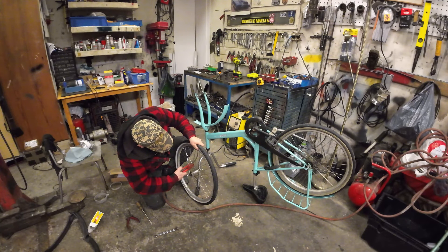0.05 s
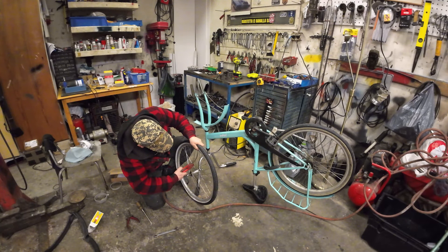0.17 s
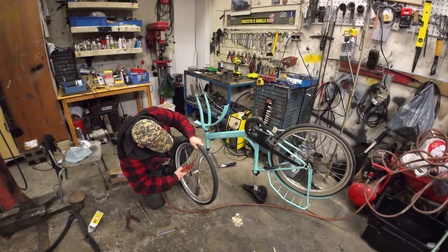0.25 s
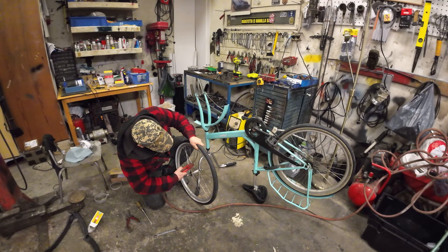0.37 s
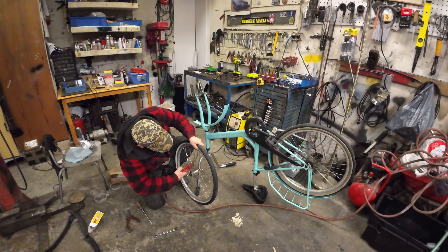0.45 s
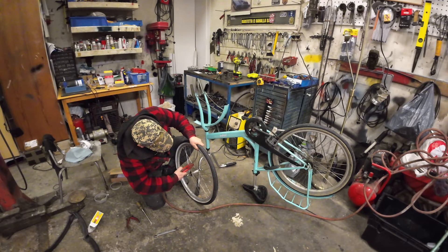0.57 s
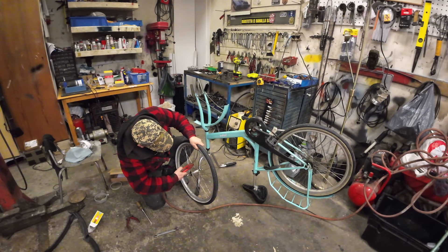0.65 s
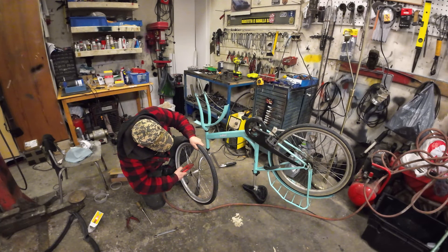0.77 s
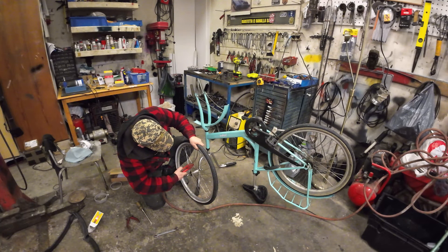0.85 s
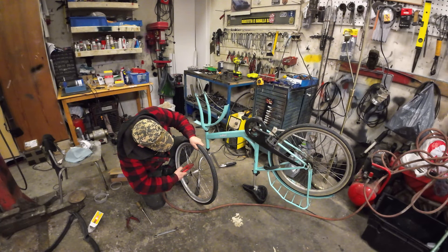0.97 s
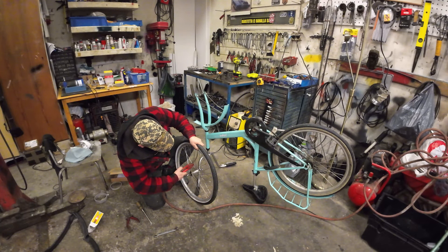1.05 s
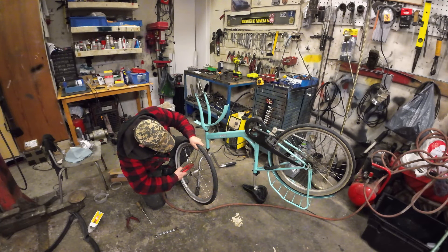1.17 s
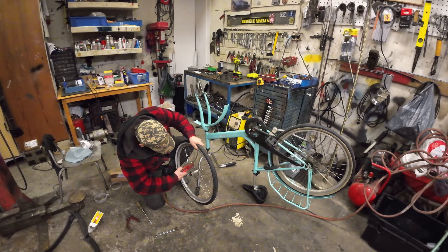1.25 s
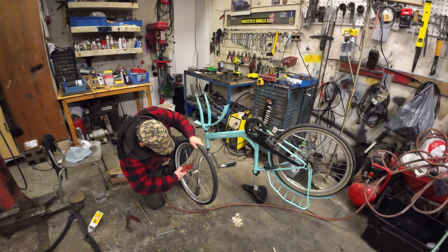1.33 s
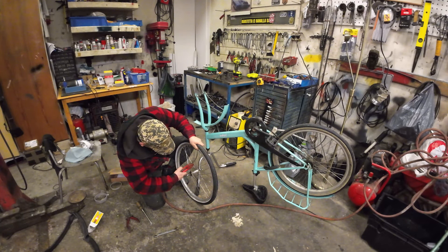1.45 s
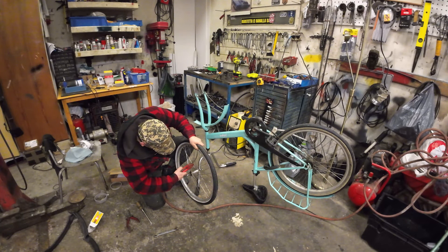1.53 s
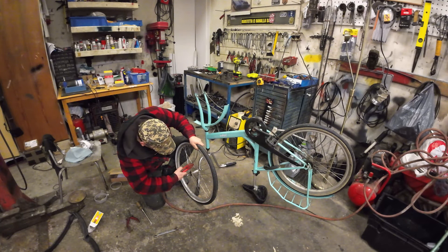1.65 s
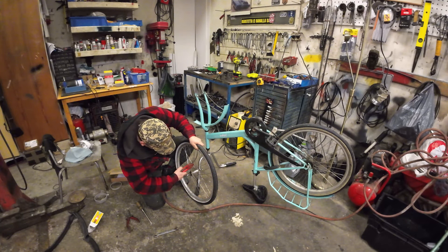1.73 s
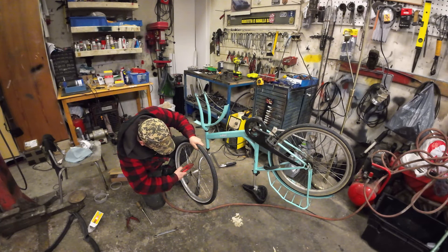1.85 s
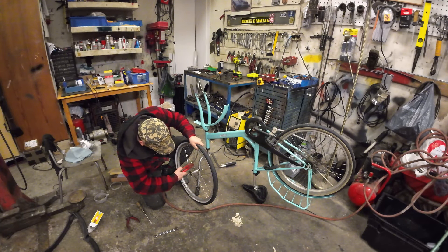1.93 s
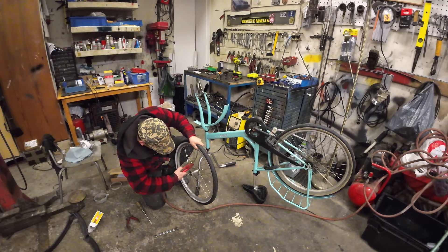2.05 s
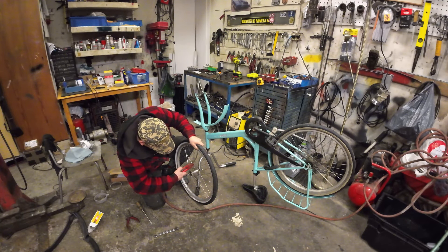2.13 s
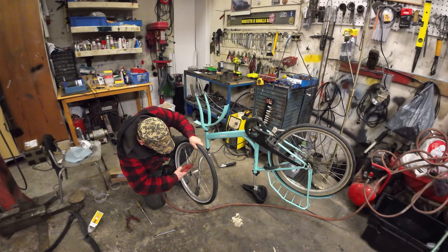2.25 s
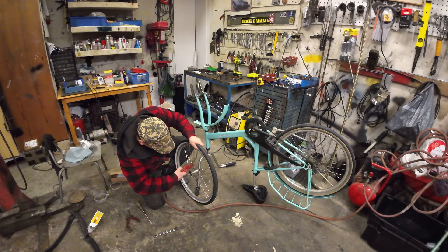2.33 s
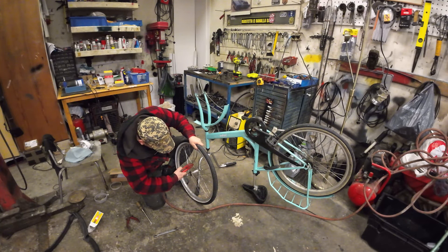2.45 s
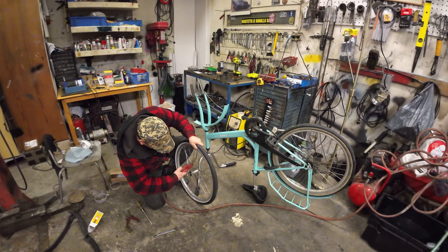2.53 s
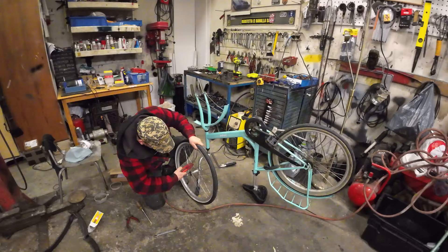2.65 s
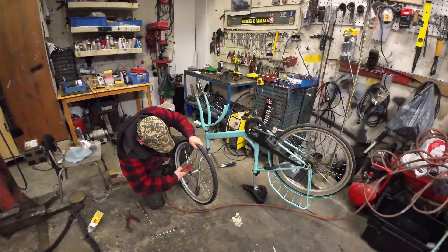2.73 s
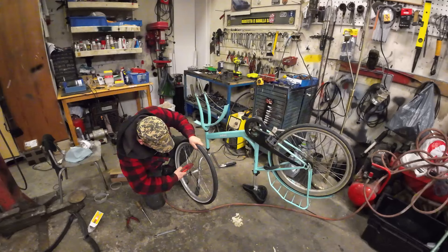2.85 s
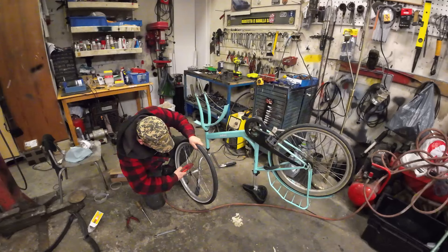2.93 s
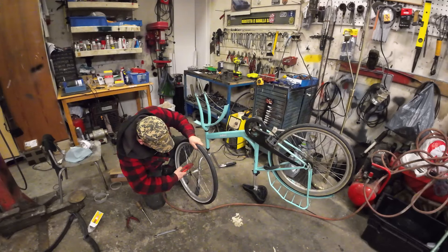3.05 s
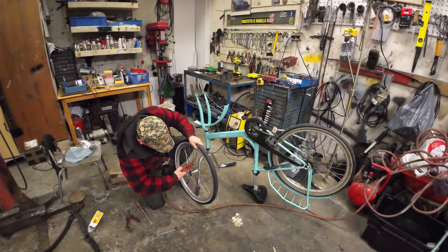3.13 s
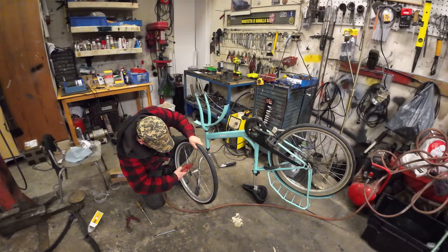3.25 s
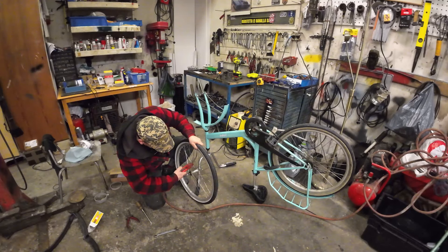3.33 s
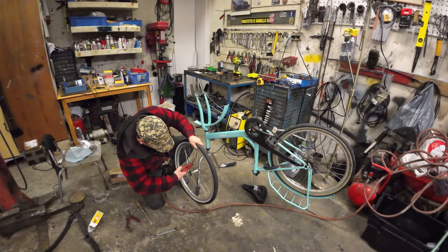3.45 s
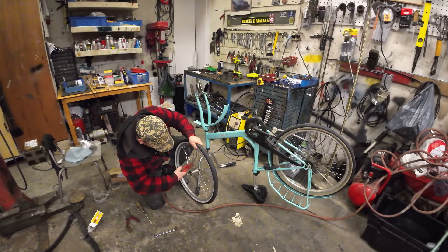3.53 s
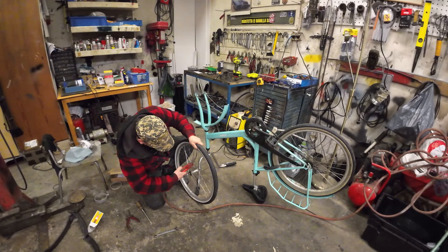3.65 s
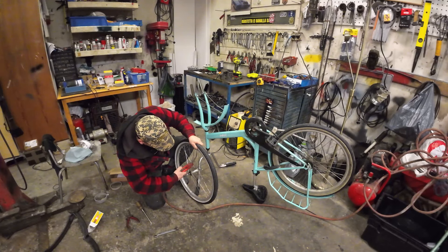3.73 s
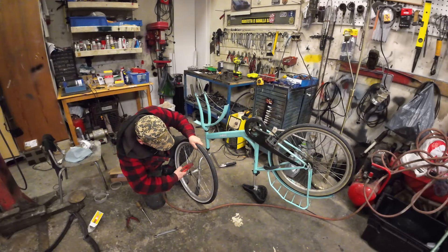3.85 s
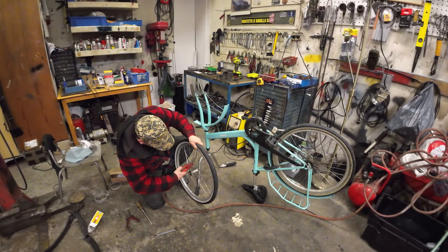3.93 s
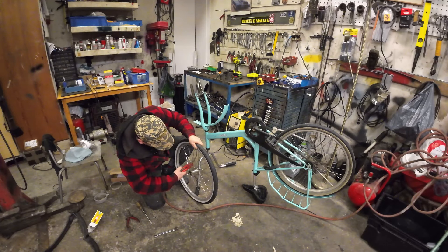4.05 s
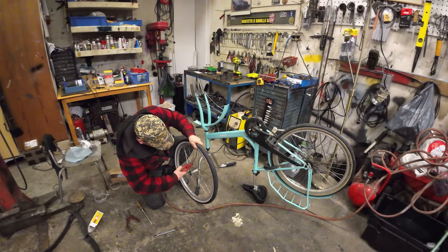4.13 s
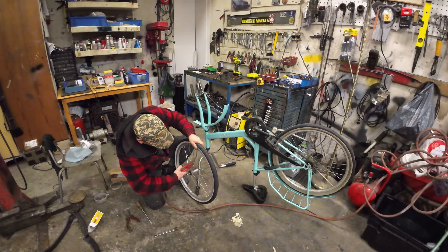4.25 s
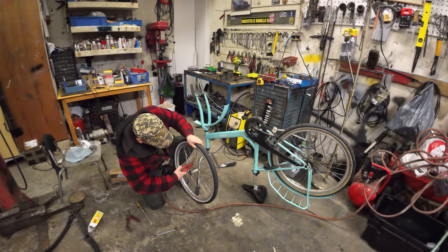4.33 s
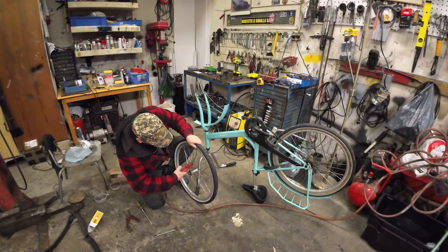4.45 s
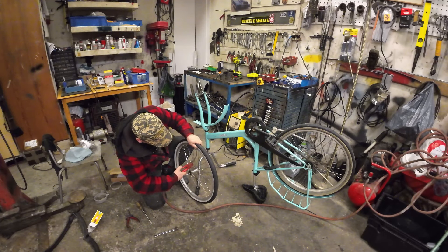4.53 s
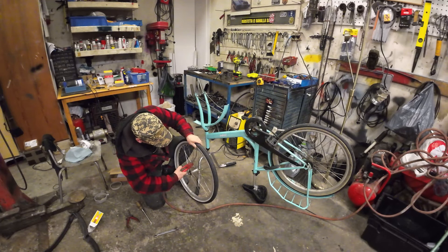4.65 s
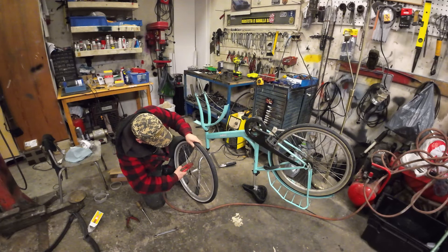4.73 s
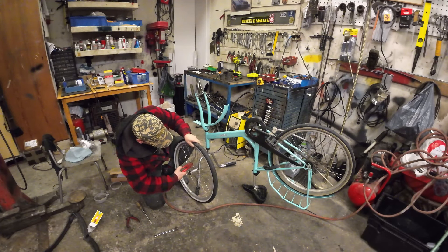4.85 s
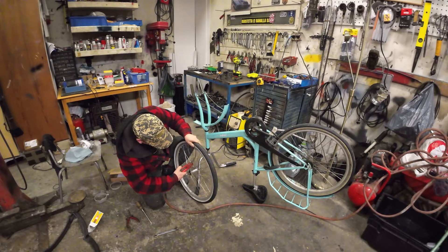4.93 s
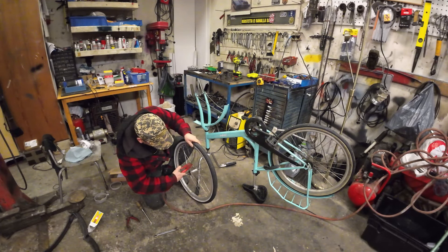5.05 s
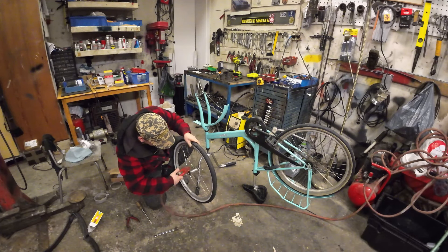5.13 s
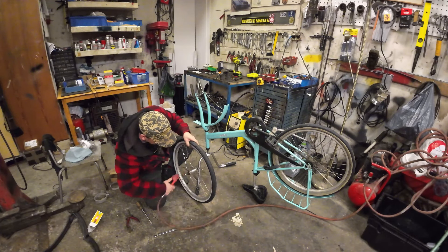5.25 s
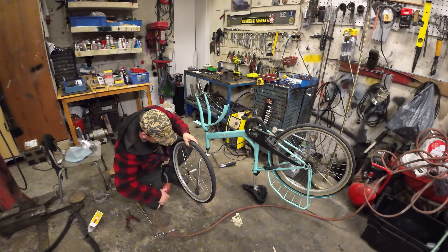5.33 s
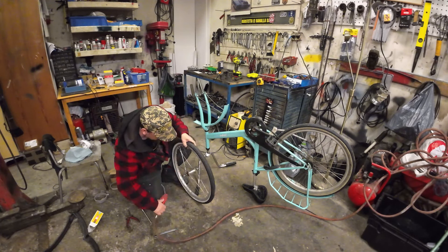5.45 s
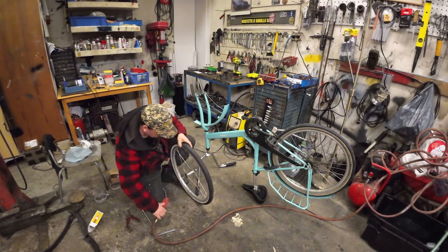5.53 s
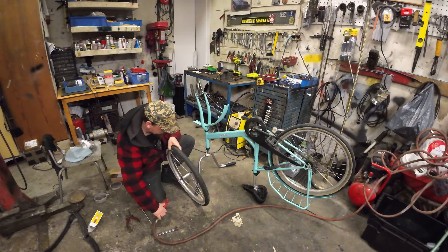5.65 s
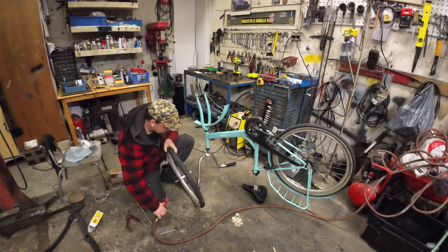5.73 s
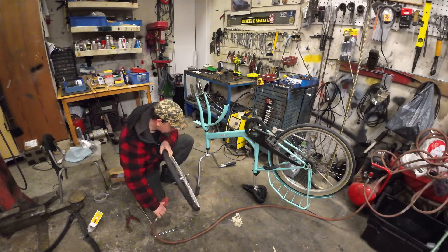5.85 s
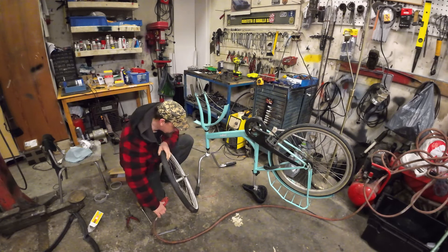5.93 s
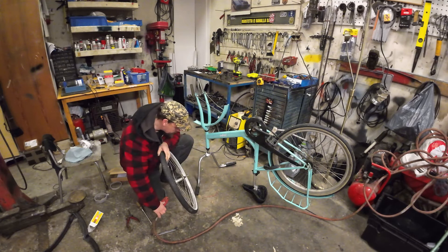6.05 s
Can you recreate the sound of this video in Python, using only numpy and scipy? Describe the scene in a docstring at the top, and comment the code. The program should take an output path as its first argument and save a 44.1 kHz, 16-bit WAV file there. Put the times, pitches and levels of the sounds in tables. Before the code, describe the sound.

Pressurised air hisses long, then twice shorter, with sputtering leaks; a hose fitting knocks the garage floor and clothing rustles.

```python
"""Three hissing bursts of air leaking past a chuck as a bicycle tyre is filled in a cluttered garage.
The leak sputters as the first burst starts and around the end of the last. Then the chuck is pulled away
and clinks on the concrete; sleeves, shoes and hose rustle. A mains hum and a low rumble fill the room.
Air and rubbing are shaped noise, sputter is random pops, clinks are noise cracks plus decaying modes.
"""
import sys
import numpy as np
from scipy import signal
from scipy.fft import rfft, irfft, next_fast_len
from scipy.io import wavfile

SR = 44100
rng = np.random.default_rng(int(sys.argv[2]) if len(sys.argv) > 2 else 0)


def log_audio(samples):
    """Write samples as a 16-bit WAV file to the path given in sys.argv[1]."""
    # one column per channel
    frames = np.atleast_2d(samples).T
    # limit to full scale, then quantise
    limited = np.clip(frames, -1, 1)
    pcm = np.round(limited * 32767).astype(np.int16)
    wavfile.write(sys.argv[1], SR, pcm)


N = 268568
TIME = np.arange(N) / SR
SIZE = next_fast_len(N + SR)
HZ = np.maximum(np.arange(SIZE // 2 + 1) * SR / SIZE, 1)

# Chuck pressed on the valve. Each row: opening in seconds, shutting in seconds, snap time in seconds,
# lifting time in seconds, hiss in dB, bore in dB, share of the cavity lift, seating resonance in Hz.
BURSTS = [(0.145, 2.29, .003, 0.042, -36, -40.5, 0.42, 1550),
          (2.375, 3.501, 0.0018, 0.044, -37, -42, 1.15, 2010),
          (3.606, 4.212, 0.0074, .025, -38, -42.5, 0.54, 1820)]
# Spectra of the jet's hiss, its bore and the plume. Each row: frequency in Hz, relative density in dB per Hz.
HISS = [(1500, -14.5), (3000, -8.5), (3700, -3.5), (4600, -6.5), (6500, -3.5), (9000, -3.5), (12500, -1),
        (14000, -2.5), (16000, -7.5)]
BORE = [(450, -17), (680, -6), (790, 0), (1500, 0), (2200, -1), (3000, -2), (4200, -11), (7000, -35)]
RUSH = [(15, -2.5), (35, 2), (60, 2.5), (95, -0.5), (140, -3), (250, -4.5), (450, -1.5), (650, -5),
        (1000, -13.5), (2500, -33)]
# Resonances of gap and valve stem. Each row: frequency in Hz, width in Hz, lift in dB.
STEM = [(5044, 230, 5.5), (5410, 480, 3.5), (6070, 630, 2.5), (7800, 790, 4.5), (9370, 380, 4.5),
        (9890, 520, 5.5), (10620, 430, 7.5), (11360, 300, 4.5), (11900, 280, 6), (14780, 440, 5.5),
        (15260, 600, 7)]
# Cavity between chuck and valve. Each row: frequency in Hz, width in Hz, lift in dB at a share of 1.
CAVITY = [(815, 150, 1.5), (2630, 410, 6)]
# Whistle of the gap's edge. Each row: frequency in Hz, width in Hz, lift in dB.
WHISTLE = [(8260, 430, 6), (9340, 170, 7.5)]
# Spurts past the badly seated chuck. Each row: centre in seconds, half length in seconds, level in dB.
SPURTS = [(0.267, 0.036, -35), (0.36, 0.036, -43), (4.132, .012, -45.5), (4.277, 0.033, -48.5),
          (4.388, 0.022, -55)]
# Air seeping from the closed chuck. Each row: time in seconds, level in dB.
SEEP = [(0, -65.5), (4.65, -73.5), (4.95, -82), (5.6, -73.5), (5.85, -72), (6.09, -74.5)]
# Resonances of the seep. Each row: frequency in Hz, width in Hz, lift in dB.
SEEP_PEAKS = [(2510, 210, 16.5), (3450, 290, 12), (5700, 1000, 13.2), (10000, 700, 6.2)]
# Knocks of chuck and hose. Each row: start in seconds, level in dB, contact decay in seconds,
# share of metal ringing 0-1.
CLINKS = [(4.378, -47.5, .003, 0.15), (4.642, -48, 0.0016, 0), (5.111, -46.5, .004, 0.06),
          (5.1867, -35.5, 0.0064, 0.45), (5.1951, -36.5, 0.01, 0.33), (5.2127, -48, 0.0054, 0.4),
          (5.264, -50, .004, .3), (5.470, -50, .004, 0.1)]
# Modes of the metal chuck. Each row: frequency in Hz, relative level in dB, t60 in seconds.
CHUCK = [(1800, -1, 0.16), (2270, -4, .15), (2500, -7, 0.33), (2660, 2, 0.16), (3680, -3, 0.13),
         (5250, -3.5, 0.27), (5900, -10, 0.25), (6300, -2.5, 0.16), (7900, -1.5, .14), (11700, -9, 0.17)]
# Contact noise. Each row: frequency in Hz, relative density in dB per Hz.
CRACK = [(500, -5), (1400, -14), (1800, 2.5), (2700, -2), (4300, -7), (6400, 0), (7200, -6), (12000, -8),
         (13000, -15), (15500, -15)]
# Strokes of sleeves, shoes and hose; the first row is the fading tail of an earlier burst of air as the scene
# opens. Each row: start in seconds, level in dB, rise in seconds, decay in seconds, low-pass corner in Hz.
STROKES = [(0, -46, 0.0024, 0.026, 9100), (4.591, -53, 0.0056, 0.023, 2200), (4.64, -50, .002, .035, 2000),
           (4.71, -56, 0.0057, .05, 1800), (4.79, -57, 0.022, 0.049, 7000), (5.19, -50, 0.068, 0.073, 2500),
           (5.405, -49.5, .003, 0.025, 1400), (5.468, -49, 0.0098, 0.12, 7500),
           (5.74, -64, 0.13, 0.14, 6000)]
# Rubbing noise. Each row: frequency in Hz, relative density in dB per Hz.
CLOTH = [(60, -13), (200, -8), (450, -6), (900, -7.5), (2400, -11), (4500, -12.5), (6000, -13.5),
         (11500, -9), (16000, -25)]
# Decay of the garage. Each row: frequency in Hz, t60 in seconds.
GARAGE_T60 = [(100, 0.34), (600, 0.59), (2500, 0.54), (7000, 0.47), (15000, 0.2)]
# Reverberation against direct sound. Each row: frequency in Hz, level in dB.
GARAGE_DB = [(100, 0), (1500, -2), (5000, 0), (10000, -3), (15000, 1)]
# Diffuse sound at the two ports. Each row: frequency in Hz, left-right correlation.
LIKENESS = [(40, 0.079), (250, 0.35), (700, 0.68), (1300, 0.75), (2300, 0.99), (3500, 0.67), (6000, 0.35),
            (11000, -.15), (15000, .15)]
# Direct sound at the two ports. Each row: frequency in Hz, phase lead of the left in radians.
PORT_PHASE = [(100, 0.037), (4000, -0.34), (6000, -0.74), (8000, -0.48), (10500, -0.98), (13000, -0.23),
              (14700, -0.41), (15400, -.1)]
# Room rumble. Each row: frequency in Hz, relative density in dB per Hz.
AMBIENCE = [(18, 3), (45, -2.5), (100, -14.5), (150, -18), (230, -22.5), (380, -19.5), (620, -28),
            (1200, -26), (2400, -30.5), (4500, -35.5), (6000, -34), (11000, -41), (16000, -46)]
# Mains hum. Each row: frequency in Hz, rms level in dB before the trim of hum().
HUM = [(101, -69), (300.5, -70), (400, -71), (500.5, -77.5), (1200, -78.5)]

# the valve pin snaps open to a share of its travel, then is pressed home;
# bore and plume need a wider opening than the hiss
SNAP_SHARE, PRESS_S, BORE_POWER, RUSH_POWER = 0.21, 0.036, 1.46, 1.9
# the hose recharges between bursts, so each starts stronger and sags
SAG_DB, SAG_S = 2.5, 0.77
# the plume weakens steadily as the tyre fills
RUSH_DB, RUSH_FALL_DB_PER_S = -43.5, 2.5
# extra leak until the chuck is first seated
SURGE_AT_S, SURGE_HALF_S, SURGE_HISS_DB, SURGE_BORE_DB = 0.32, 0.063, 2.5, 4
# cavity resonance that moves with each seating
SEATING_WIDTH_HZ, SEATING_DB = 310, 3
WHISTLE_AT_S, WHISTLE_HALF_S = 2.68, 0.2
AMBIENCE_DB = -57.5
CUTOFF_HZ = 15790


def from_db(db):
    """Decibels to gain."""
    return 10 ** (np.asarray(db) / 20)


def rms_one(x):
    """Scale to unit rms."""
    return x / np.sqrt(np.mean(x ** 2) + 1e-20)


def at_hz(points, hz=HZ):
    """Read a table on a log-frequency axis."""
    centres_hz, values = np.transpose(points)
    return np.interp(np.log(hz), np.log(centres_hz), values)


def filtered(x, response):
    """Pass a signal through a frequency response."""
    return irfft(rfft(x, SIZE) * response, SIZE)[..., :N]


def bumps(peaks):
    """Gain in dB of a set of resonances."""
    return sum(lift_db / (1 + (2 * (HZ - hz) / width_hz) ** 2) for hz, width_hz, lift_db in peaks)


def swell(centre_s, half_s):
    """A smooth rise and fall of height 1."""
    return np.exp(-.5 * ((TIME - centre_s) / half_s) ** 2)


def drift(rate_hz):
    """Slow random wander, rms 1."""
    return rms_one(filtered(rng.standard_normal(N), 1 / (1 + (HZ / rate_hz) ** 2)))


def turbulence(gain_db):
    """Noise of the given colour, rms 1."""
    return rms_one(filtered(rng.standard_normal(N), from_db(gain_db)))


def sputter(per_s, spread_db, dull_hz):
    """Rounded pressure drops at random moments, rms 1."""
    sizes = from_db(spread_db * np.clip(rng.standard_normal(N), -2, 1.5))
    pops = (rng.random(N) < per_s / SR) * sizes
    pole = np.exp(-2 * np.pi * dull_hz / SR)
    return -rms_one(signal.lfilter([1], [1, -2 * pole, pole ** 2], pops - pops.mean()))


def air():
    """The jet hisses through the stem's resonances, blows in the bore and spreads into a lumpy, spitting plume."""
    eddies, surge = drift(rate_hz=53), swell(SURGE_AT_S, SURGE_HALF_S)
    hiss = whistle(turbulence(at_hz(HISS) + bumps(STEM)))
    hiss = hiss * from_db(SURGE_HISS_DB * surge - 0.75 + 0.38 * eddies)
    bore = turbulence(at_hz(BORE)) * from_db(SURGE_BORE_DB * surge - 4.5 + 0.54 * eddies)
    rush = turbulence(at_hz(RUSH)) * from_db(-3.0 + 2.5 * drift(rate_hz=26))
    spits = sputter(per_s=200, spread_db=4.5, dull_hz=3000) * from_db(-7.5)
    plume = (rush + spits) * from_db(RUSH_DB - RUSH_FALL_DB_PER_S * TIME)
    out = 0
    for start_s, end_s, snap_s, lift_s, hiss_db, bore_db, ringing, seating_hz in BURSTS:
        opening = valve(start_s, end_s, snap_s, lift_s)
        pressure = from_db(SAG_DB * np.exp(-np.maximum(TIME - start_s, 0) / SAG_S))
        jet = hiss * from_db(hiss_db) * opening + bore * from_db(bore_db) * opening ** BORE_POWER
        out = out + cavity(pressure * jet, ringing, seating_hz) + plume * opening ** RUSH_POWER
    return out


def valve(start_s, end_s, snap_s, lift_s):
    """Opening 0-1: it snaps ajar, widens as the chuck is pressed home and narrows as it lifts."""
    since_s, left_s = np.maximum(TIME - start_s, 0), np.maximum(end_s - TIME, 0)
    snapped = np.minimum(since_s / snap_s, 1)
    pressed = 1 - (1 - SNAP_SHARE) * np.exp(-since_s / PRESS_S)
    lifted = 1 - np.exp(-left_s / lift_s)
    return snapped * pressed * lifted


def whistle(hiss):
    """Two narrow resonances rise out of the hiss and sink back."""
    return hiss + swell(WHISTLE_AT_S, WHISTLE_HALF_S) * filtered(hiss, from_db(bumps(WHISTLE)) - 1)


def cavity(jet, ringing, seating_hz):
    """The cavity colours the jet, a little differently with each seating of the chuck."""
    peaks = [*CAVITY, (seating_hz, SEATING_WIDTH_HZ, SEATING_DB)]
    return filtered(jet, from_db(ringing * bumps(peaks)))


def spurts(pops_db, thump_db):
    """Air bursts out under the rim of the chuck: a low flutter full of pops."""
    strength = sum(from_db(db) * swell(centre_s, half_s) for centre_s, half_s, db in SPURTS)
    pops = sputter(per_s=280, spread_db=3.5, dull_hz=2200)
    # Hz, dB per Hz
    flutter = turbulence(at_hz([(15, -2), (50, -0.5), (130, -8.5), (600, -11), (2000, -34)]))
    return strength * (from_db(pops_db) * pops + from_db(thump_db) * flutter)


def seep():
    """A thin resonant hiss of air from the closed chuck, its hose still under pressure."""
    level_db = np.interp(TIME, *np.transpose(SEEP))
    # Hz, dB per Hz
    colour_db = at_hz([(500, -3), (2000, 0.0), (9000, -4.5), (16000, -2)])
    return turbulence(bumps(SEEP_PEAKS) + colour_db) * from_db(level_db)


def chuck(crack_db, ring_db, split):
    """Each knock is a short gritty crack plus ringing metal; the chuck's loose parts split every mode in six."""
    out, t = np.zeros(N + SR), TIME[:SR // 2]
    hz, level_db, t60_s = np.repeat(CHUCK, 6, axis=0).T[:, :, None]
    hz = hz * (1 + split * rng.uniform(-1, 1, hz.shape))
    decay = from_db(level_db - level_db.max() - 60 * t / t60_s)
    modes = decay * np.sin(2 * np.pi * hz * t)
    grit = turbulence(at_hz(CRACK))
    for start_s, db, contact_s, metal in CLINKS:
        at = int(start_s * SR)
        crack = grit[at:at + len(t)] * np.exp(-t / contact_s)
        ring = rng.uniform(-0.94, 1, len(modes)) @ modes
        out[at:at + len(t)] += from_db(db) * (from_db(crack_db) * crack + from_db(ring_db) * metal * ring)
    return out[:N]


def rustle(level_db, crease_db):
    """Noise of rubbing cloth and hose with small dull creases; each stroke rises and dies away. The first
    stands for the fading tail of an earlier burst of air."""
    rub = turbulence(at_hz(CLOTH))
    creases = from_db(crease_db) * sputter(per_s=70, spread_db=6.0, dull_hz=1900)
    out = 0
    for start_s, db, rise_s, decay_s, dull_hz in STROKES:
        rise = np.clip((TIME - start_s) / rise_s, 0, 1)
        fall = np.exp(-np.maximum(TIME - start_s - rise_s, 0) / decay_s)
        dulled = signal.lfilter(*signal.butter(1, dull_hz, fs=SR), rub + creases)
        out = out + from_db(db + level_db) * rise * fall * dulled
    return out


def garage(towards_mic, towards_walls):
    """Direct sound at the two ports, plus dense reflections off the clutter that die sooner in the treble."""
    t, centres_hz = TIME[:SR // 2], np.geomspace(100, 16000, 8)
    white = rfft(rng.standard_normal((2, len(t))))
    hz = np.maximum(np.arange(len(t) // 2 + 1) * SR / len(t), 1)
    tail = 0
    for centre_hz, share in zip(centres_hz, np.eye(len(centres_hz))):
        # reflections start after 3 ms
        decay = from_db(-60 * t / at_hz(GARAGE_T60, centre_hz)) * (t > .003)
        band = irfft(white * np.interp(np.log(hz), np.log(centres_hz), share), len(t))
        tail = tail + band * decay / np.linalg.norm(decay)
    wet = diffuse(filtered(towards_walls, rfft(tail, SIZE) * from_db(at_hz(GARAGE_DB))))
    direct = filtered(towards_mic, np.exp(.5j * at_hz(PORT_PHASE) * np.array([[1], [-1]])))
    return wet + direct


def diffuse(pair):
    """Two unrelated signals become a diffuse field at two close ports."""
    alike = np.clip(at_hz(LIKENESS), -.98, .98)
    mid, side = filtered(pair, np.sqrt([1 + alike, 1 - alike]))
    return np.array([mid + side, mid - side]) / np.sqrt(2)


def rumble():
    """Steady diffuse room noise, strongest in the bass."""
    return from_db(AMBIENCE_DB) * diffuse([turbulence(at_hz(AMBIENCE)) for _ in range(2)])


def hum(level_db, waver_db):
    """Mains harmonics as sines, each wavering in level."""
    out = 0
    for hz, db in HUM:
        level = from_db(db + level_db + waver_db * drift(rate_hz=3.6))
        out = out + level * np.sqrt(2) * np.sin(2 * np.pi * (hz * TIME + rng.random()))
    return out


def scene():
    """The work at the wheel, heard in the room over its steady background."""
    work = spurts(pops_db=-5.0, thump_db=-5.5) + seep()
    work = work + chuck(crack_db=-8, ring_db=-12.5, split=.035)
    work = work + rustle(level_db=-6, crease_db=-4.5)
    # a turbulent jet sends unrelated noise in different directions
    return garage(work + air(), work + air()) + rumble() + hum(level_db=-2, waver_db=3.0)


def record(dry):
    """The top is cut steeply."""
    return filtered(dry, 1 / np.sqrt(1 + (HZ / CUTOFF_HZ) ** 900))


dry = scene()
out = record(dry)
log_audio(out)
```